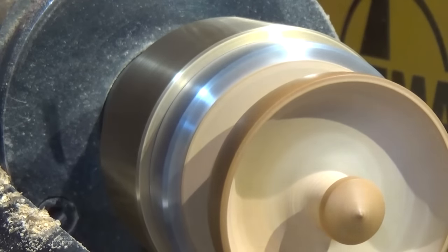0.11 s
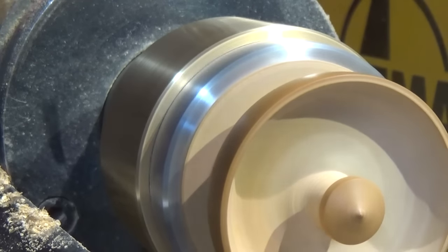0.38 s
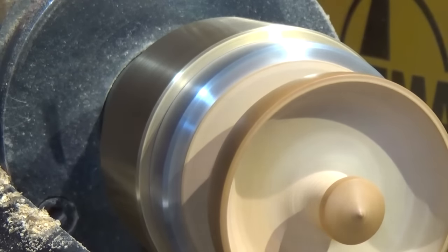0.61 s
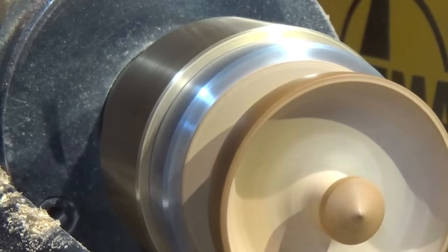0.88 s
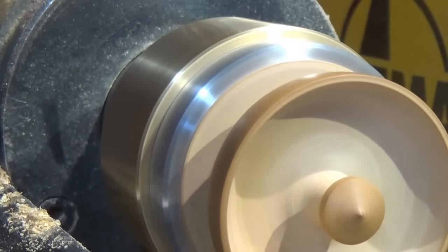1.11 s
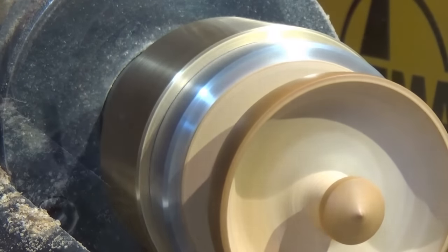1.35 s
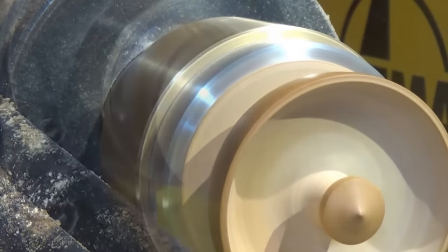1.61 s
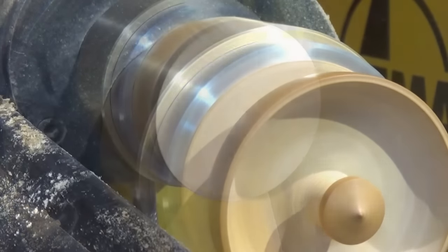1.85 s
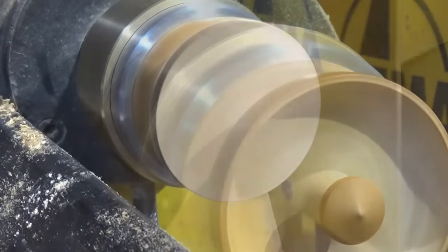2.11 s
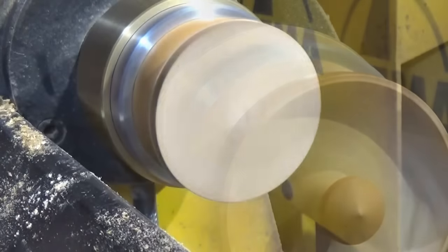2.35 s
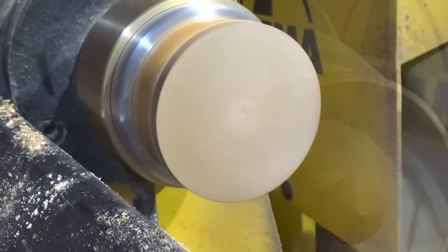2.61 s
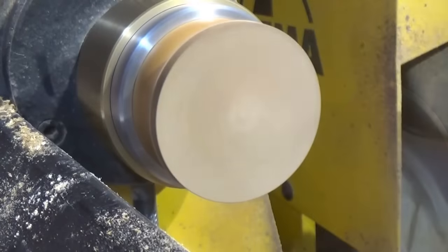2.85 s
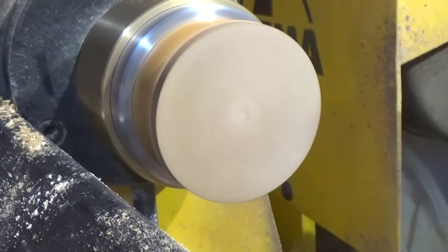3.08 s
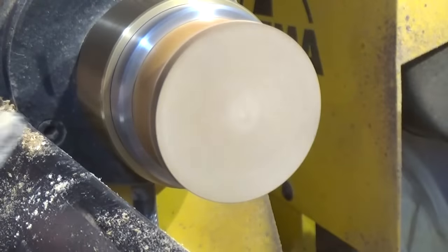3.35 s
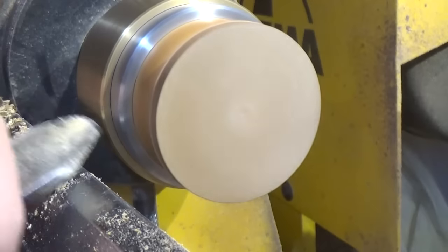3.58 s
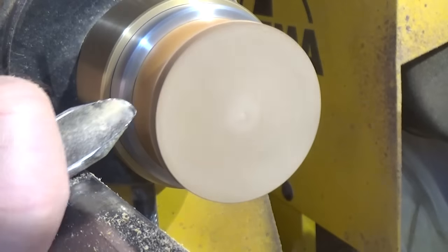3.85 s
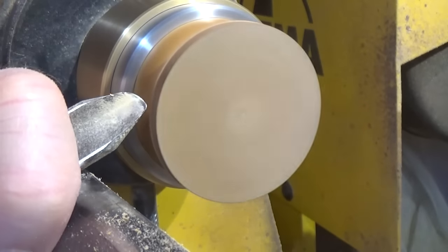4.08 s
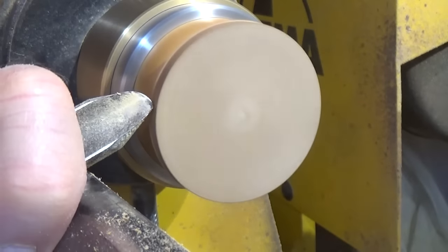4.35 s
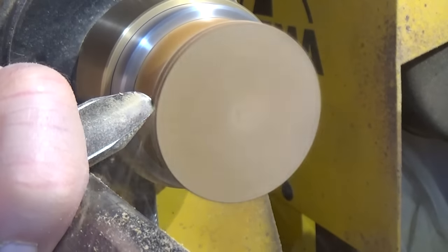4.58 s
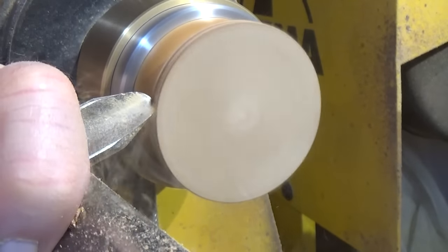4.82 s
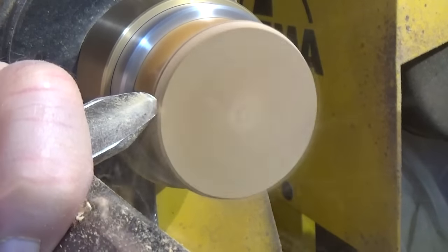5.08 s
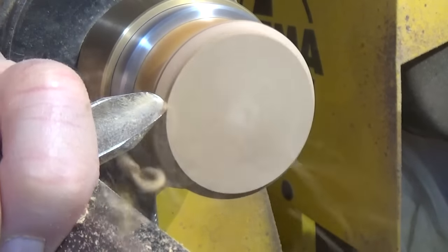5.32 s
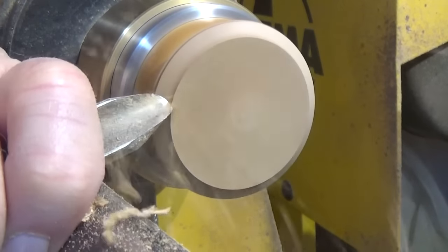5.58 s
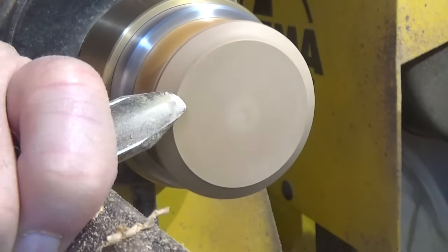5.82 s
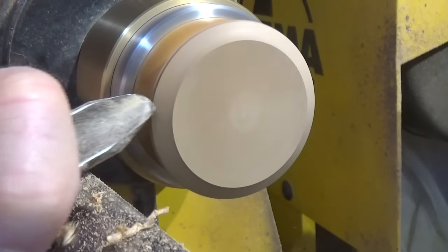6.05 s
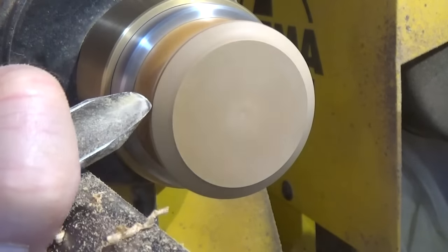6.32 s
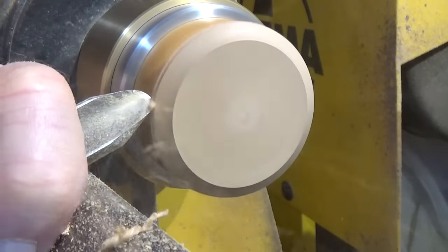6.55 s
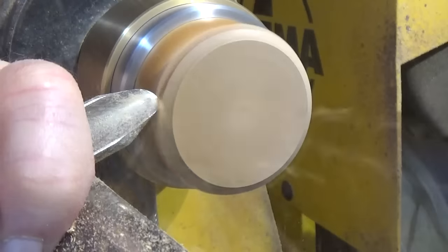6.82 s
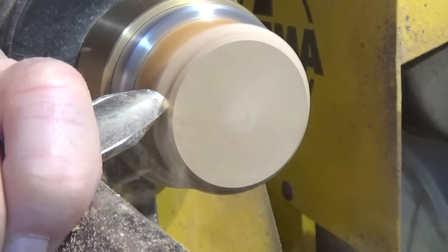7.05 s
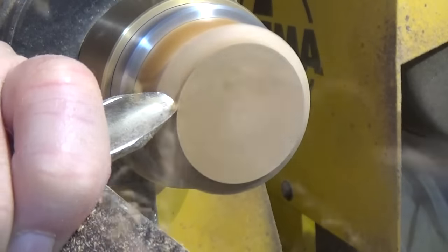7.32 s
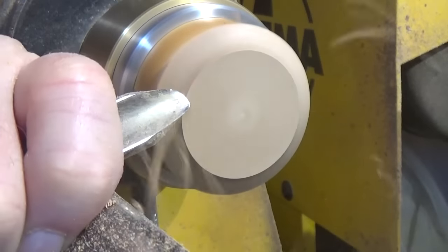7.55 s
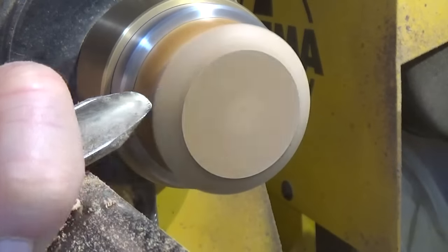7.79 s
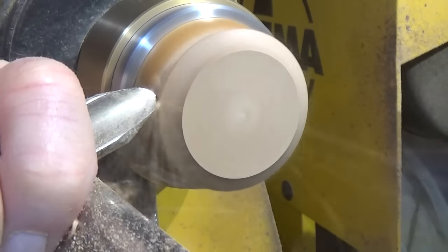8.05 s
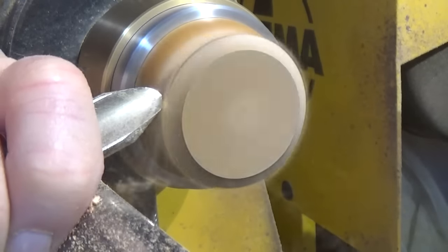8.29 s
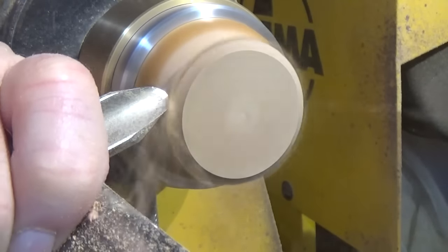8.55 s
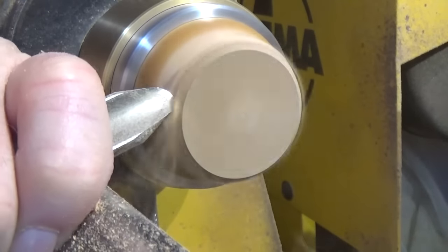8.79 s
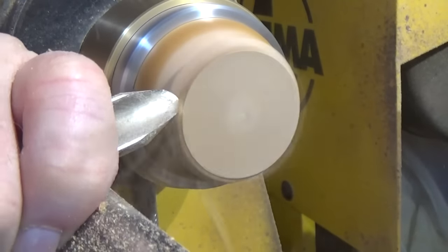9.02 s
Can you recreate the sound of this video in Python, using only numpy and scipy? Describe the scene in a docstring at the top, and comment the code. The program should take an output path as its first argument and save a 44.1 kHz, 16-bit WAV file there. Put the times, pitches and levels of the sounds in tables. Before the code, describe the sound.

Piercing electronic lathe whine with soft fast ticking, a switch knock and overlapping restart, then three harsh, hissing gouge cuts with short gaps.

```python
"""Wood lathe idling, then cut with a gouge

A wood lathe with an electronic drive idles close by: steady switching whine with sidebands, noise-made rumble, one
main tick a turn. A knock sounds at the switch-off; the first run coasts down while a second run-up fades in over it.
Then a gouge takes three rasping passes, with a duller knock as the first one eases off: bursts of torn noise ring
the blank, the tool and its climbing edge resonance. A camera's gain control pushes the machine down under them."""
import sys
import numpy as np
from scipy import signal
from scipy.fft import rfft, irfft, next_fast_len
from scipy.io import wavfile
from scipy.ndimage import uniform_filter1d, minimum_filter1d, map_coordinates

SR = 44100
rng = np.random.default_rng(int(sys.argv[2]) if len(sys.argv) > 2 else 0)


def invert_db(level):
    """Linear amplitude ratio for a level in decibels (20 dB per decade), elementwise."""
    return 10 ** (np.asarray(level, dtype=float) / 20)


def materialize(psi):
    """Save the field psi as 16-bit PCM at rate SR to the path in sys.argv[1].

    A 1-D psi becomes a single channel; in a 2-D psi each row is a channel.
    """
    bounded = np.clip(np.atleast_2d(psi).T, -1, 1)
    quanta = np.round(bounded * 32767).astype(np.int16)
    wavfile.write(sys.argv[1], SR, quanta)


N = 403956
TIME = np.arange(N) / SR

# Spindle: reference speed [turns per s]; a moment of a tick in each run [s]
FULL_SPEED, FIRST_TICK_S, SECOND_TICK_S = 27.25, .0383, 3.0365
# First run: top speed [turns per s], switch-off [s], coasting loss [turns per s each s]
FIRST_TOP, OFF_S, COAST = 27.273, 1.71, 19.13
# Second run: top speed [turns per s], start [s], gain [turns per s each s]
SECOND_TOP, ON_S, RUN_UP = 27.23, 1.55, 19.25
# Slowest speed of either run and loss at full tool contact [turns per s]
CRAWL, SAG = 2, .1
FADE_START_S, FADE_END_S, FADE_CURVE = 1.45, 2.85, 1  # cross-fade; exponent of its gains

WHINE_HZ, DRIVE_HZ = 7989.5, 58  # main switching tone; drive frequency at FULL_SPEED
FIRST_STRAIN_DB, SECOND_STRAIN_DB = -2, 6  # level change of the slot tones below full speed
UPPER_GROWS = .6  # the upper tones grow with this power of the speed
RUMBLE_TRIM_DB, WAVER_DB = -37.5, 0.2  # trim of rumble and ticks; depth of the slow wavering of the whine

# Edge of the gouge: touch ramp, fading of the shallow first bite, easing off [s]; light drag [dB], [dB per s]
TOUCH_S, BITE_S, EASE_S, DRAG_DB, DRAG_DB_PER_S = .018, .05, .022, -8, -25
SKIP_LASTS_S, SKIP_DB = .007, -6  # the edge jumps briefly
THRUM_DB_PER_S = 4.5  # the thrum grows against the growl through every pass
RASP_DB, RASP_SHARE = -3, 0.31  # the rasp lies between scrape and growl: offset; share of the way to growl

# Whine over time: (time [s], level [dB])
WHINE_LEVEL = [(0, -18.5), (.28, -19), (.48, -20), (1.1, -16.5), (1.42, -19), (2.3, -19), (3.4, -19),
               (3.66, -18), (3.95, -17.5), (4.3, -17.5)]
# Sidebands of the drive: (switching tone [Hz], multiple of the drive frequency [1])
SIDEBANDS = [(7989.5, k) for k in (-7.97, -4.94, -4, -2, -1, 1, 2, 6.96, 7.97)] + [(12013.3, k) for k in (-9.97, -6.93, -2, -1, 1, 2, 5.97, 8.95, 9.97)]
# Each sideband against the main tone at full speed, one value a sideband: (level [dB])
FIRST_SIDE_LEVELS = [-21, -27, -30, -24, -10, -6, -22, -25, -14, -32, -29, -18, -18, -19, -23, -30, -31,
                     -33]
SECOND_SIDE_LEVELS = [-25, -25, -29, -22, -8, -10, -20, -26, -13, -31, -32, -21, -21, -17, -26, -36, -33,
                      -35]
# Resonances of bed, belt and bearings in each run: (centre [Hz], width [Hz], relative level [dB])
FIRST_BODY = [(3880, 210, -9.5), (4570, 110, -12), (5800, 190, -11), (6790, 51, -9), (10360, 140, -10.5),
              (14400, 790, -42)]
SECOND_BODY = [(1718, 30, -1.5), (2480, 31, -10.5), (3660, 320, -15.5), (4850, 41, -13.5), (5730, 53, -13),
               (6100, 61, -12), (13500, 320, -40), (15000, 240, -53)]
# Housing resonances common to both runs: (centre [Hz], width [Hz], relative level [dB])
HOUSING = [(174.4, 13, 1), (345.4, 23, 4), (506.5, 6.3, -1), (790.6, 11.3, 5.5), (942, 41, 2),
           (7986, 134, 2), (8460, 180, -10.5), (9300, 420, -13.5), (11100, 240, -17), (12040, 110, -20.5)]
# Smooth noise floor under those resonances: (frequency [Hz], relative level [dB])
FIRST_FLOOR = [(25, -26), (60, -8.5), (250, -5.5), (470, -10), (870, -3.5), (1870, -14), (3800, -18),
               (7000, -41), (10000, -26), (13000, -27), (15500, -51)]
SECOND_FLOOR = [(25, -38), (60, -11.5), (250, -8.5), (470, -9), (870, 1), (1370, -11), (2150, -16),
                (7000, -30.5), (10000, -24), (13000, -34), (15500, -62)]
# Modes the tick sets ringing: (frequency [Hz], relative level [dB], decay by 60 dB [s])
FIRST_RING = [(5564, -8.5, 0.026), (5715, -6.5, 0.036), (3710, -11, 0.01), (5080, -12.5, 0.0093)]
SECOND_RING = [(3870, -4, 0.0068), (6290, -3.5, .025), (9200, -1.5, 0.023), (11430, 5.5, 0.014),
               (13600, -10, 0.013), (5520, -5.5, 0.011), (10370, -3, 0.019)]
# Stereo image of machine and knocks: (frequency [Hz], left-right likeness [1])
MACHINE_ALIKE = [(60, 1), (240, 0.97), (950, 0.76), (3770, 0.84), (15000, 1)]
# Its balance: (frequency [Hz], left minus right [dB])
MACHINE_LEAN = [(60, 0.5), (180, -0.54), (550, 0.35), (1650, 0.5), (4970, -2.5), (15000, 2)]

# Switch and tool knocks: (time [s], level before colouring [dB], brightness share [1])
KNOCKS = [(1.6873, -8, 0.98), (5.773, 2.5, 0.46)]
# Colour of a knock of brightness 1: (frequency [Hz], gain [dB])
KNOCK_COLOUR = [(600, -22), (1800, -2), (4000, 0.5), (5000, -11), (6500, 0.5), (10000, -2), (15000, -29)]

# Passes: (touch [s], easing off [s], leaving [s], edge resonance at the touch [Hz], its climb [Hz per s],
# its strength [dB], blank thrum against tool growl at the touch [dB])
PASSES = [(4.51, 5.78, 5.91, 8460, 330, 2, -3), (6.454, 7.576, 7.625, 8630, 540, 5, -7),
          (7.949, 9.3, 9.4, 9300, 250.4, -2.5, -5.5)]
# One list a pass, before contact: (time [s], shaving hiss [dB], edge scrape [dB], tool growl [dB],
# middle tool modes [dB])
STROKES = [
    [(4.52, 3, -4, -24.5, -21.5), (4.85, 3.5, 0, -23, -16), (4.97, 4.5, 0.5, -11, -15),
     (5.2, -1.5, -2, -15, -10.5), (5.36, -3, -3, -25, -10), (5.55, -6.5, -3.5, -26.5, -22),
     (5.78, -10.5, -9.5, -25.5, -22)],
    [(6.46, 5, -2, -20, -24), (6.65, 0, -3, -17.5, -12.5), (6.9, -6.5, -4.5, -15, -10.5),
     (7.15, -12.5, -8, -18.5, -11.5), (7.4, -16.5, -9.5, -21.5, -12), (7.57, -15.5, -9, -29.5, -22.5)],
    [(7.95, -9, -4, -19.5, -15), (8.15, -16, -9.5, -12, -13), (8.4, -19.5, -11.5, -16, -17.5),
     (8.8, -20.5, -14, -18, -17.5), (9.15, -19, -14.5, -16.5, -15.5)],
]
# Shaving hiss, one row a pass: (peak at the touch [Hz], wait [s], climb [Hz per s], width [Hz],
# width gained per climb [Hz per Hz], floor slope [dB per kHz], floor at 12 kHz [dB])
SHAVING = [(10950, .35, 4000, 720, 1.4, 0.7, -19), (13700, .01, 8200, 1200, 0.1, .3, -10.5),
           (12100, .01, 30, 3000, .3, 0.2, -6)]
# Resonances of gouge and rest: (centre [Hz], width [Hz], relative level [dB])
TOOL = [(1640, 144, -5.5), (2553, 186, 1), (3375, 48, -6.5), (3818, 52, -1.5), (4524, 24, -1.5),
        (4870, 38, -4.5), (5015, 35, -4), (5420, 120, -6.5), (5697, 87, 2), (6380, 120, -6.5)]
# Resonances of the thrumming blank: (centre [Hz], width [Hz], relative level [dB])
BLANK = [(352, 18, -53), (895, 37, 1), (1098, 7.7, 0)]
# Brief jumps of the edge: (time [s])
SKIPS = (6.522, 7.963)
# Stereo image of the cutting: (frequency [Hz], left-right likeness [1])
CUT_ALIKE = [(60, 0.89), (240, 0.8), (950, 0.74), (3770, 0.93), (15000, 1)]
# Its balance: (frequency [Hz], left minus right [dB])
CUT_LEAN = [(60, -3), (150, 0.0), (380, 1), (950, 1.5), (2380, 5.5), (5980, 0), (15000, 0.5)]


def unit(x):
    """Scale to rms 1."""
    return x / np.sqrt(np.mean(x ** 2) + 1e-20)


def along(points, hz):
    """Read (Hz, value) points on a log frequency axis."""
    f, v = np.transpose(points)
    return np.interp(np.log(hz + 1), np.log(f + 1), v)


def curves(rows, t=TIME):
    """One curve for each column after the time."""
    s, *cols = np.transpose(rows)
    return [np.interp(t, s, c) for c in cols]


def wobble(rate):
    """A smooth random curve, rate knots a second."""
    knots = rng.standard_normal(int(N * rate / SR) + 4)
    return map_coordinates(knots, [TIME * rate])


def filtered(x, response):
    """Filter x by a response given as a function of frequency."""
    m = next_fast_len(N + 8192)
    spectrum = rfft(x, m) * response(np.fft.rfftfreq(m, 1 / SR))
    return irfft(spectrum, m)[..., :N]


def peak(hz, centre_hz, width_hz):
    """Power response of one resonance."""
    return 1 / (1 + (2 * (hz - centre_hz) / width_hz) ** 2)


def resonant(modes, hz, floor_db):
    """Gain of resonances standing on a floor, added as powers."""
    modes_power = sum(invert_db(db) ** 2 * peak(hz, centre, width) for centre, width, db in modes)
    return np.sqrt(invert_db(floor_db) ** 2 + modes_power)


def band(hz, lo_hz, hi_hz):
    """Gain of a steep-sided band."""
    return 1 / np.sqrt((1 + (lo_hz / (hz + 1)) ** 12) * (1 + (hz / hi_hz) ** 16))


def stereo(pair, alike, lean):
    """Mix two unrelated versions of a sound as mid and side, setting likeness and balance by frequency."""
    def mid_side_gain(hz):
        angle = np.arccos(np.clip(along(alike, hz), -1, 1)) / 2
        return np.array([np.cos(angle), np.sin(angle)])

    def balance(hz):
        return invert_db(along(lean, hz) / 2 * np.array([[1], [-1]]))

    mid, side = filtered(pair, mid_side_gain)
    return filtered(np.array([mid + side, mid - side]), balance)


def in_pass(t):
    """Index of the latest pass and seconds since its touch."""
    touch_s = np.array(PASSES)[:, 0]
    k = np.maximum(np.searchsorted(touch_s, t) - 1, 0)
    return k, np.maximum(t - touch_s[k], 0)


def contact():
    """Share of full contact between edge and wood: it lands, eases off to a light drag, leaves, and skips."""
    k, since = in_pass(TIME)
    _, ease_s, leave_s = np.array(PASSES)[k, :3].T
    eased = TIME - ease_s
    drag_db = DRAG_DB * np.clip(eased / EASE_S, 0, 1) + DRAG_DB_PER_S * np.maximum(eased, 0)
    drag_db += SKIP_DB * sum(np.exp(-((TIME - s) / SKIP_LASTS_S) ** 2) for s in SKIPS)
    return invert_db(drag_db) * np.clip(np.minimum(since, leave_s - TIME) / TOUCH_S, 0, 1)


def speeds():
    """The first run coasts down at a steady rate; the second runs up and sags under the tool."""
    first = np.clip(FIRST_TOP - COAST * (TIME - OFF_S), CRAWL, FIRST_TOP)
    second = np.clip(CRAWL + RUN_UP * (TIME - ON_S), CRAWL, SECOND_TOP)
    return first, second - SAG * uniform_filter1d(contact(), size=SR // 8)


def turns(speed, tick_s):
    """Spindle turns summed from the speed, whole at each tick."""
    count = np.cumsum(speed) / SR
    return count - count[round(tick_s * SR)]


def ticks(count, ring, half_db, scatter_db):
    """A seam passes once a turn, more weakly half a turn later, and rings short modes at varying strengths."""
    at = np.flatnonzero(np.diff(np.floor(2 * count)) > 0)
    t, out = np.arange(SR // 20) / SR, np.zeros(N)
    weak = np.round(2 * count[at]) % 2
    size_db = scatter_db * rng.standard_normal(len(at)) * (1 + weak)
    onset = 1 - np.exp(-t / .0004)  # soft contact
    for hz, db, t60 in ring:
        weak_db = half_db * weak * np.clip(2.2 - hz / 6000, .25, 2)  # the weak touch is brighter
        mode_db = .6 * scatter_db * rng.standard_normal(len(at))
        blows = np.zeros(N)
        blows[at] = invert_db(size_db + weak_db + mode_db)
        ringing = onset * invert_db(db - 60 * t / t60) * np.sin(2 * np.pi * hz * t)
        out += signal.fftconvolve(blows, ringing)[:N]
    return out


def running(speed, tick_s, body, floor, ring, body_db, floor_db, tick_db, half_db):
    """Rumble and hiss as noise through the body, pulsing twice a turn, plus ticks; both grow with the speed."""
    count = turns(speed, tick_s)
    pulse = invert_db(0.99 * np.cos(4 * np.pi * count) + 0.84 * wobble(15))
    noise = rng.standard_normal((2, N)) * pulse * (speed / FULL_SPEED) ** 0.58
    hum = filtered(noise, lambda hz: resonant(body + HOUSING, hz, along(floor, hz) + floor_db))
    ticking = (speed / FULL_SPEED) ** 1.1 * ticks(count, ring, half_db, scatter_db=1.6)
    return invert_db(body_db) * hum + invert_db(tick_db) * ticking


def whine(side_db, speed, drift, strain_db):
    """Sidebands lie off their switching tone by multiples of the drive frequency, mostly as a warble of pitch."""
    out = np.zeros((2, N))
    drive = 2 * np.pi * np.cumsum(DRIVE_HZ * speed / FULL_SPEED) / SR
    for (carrier, order), db in zip(SIDEBANDS, side_db):
        # slot tones (the farther sidebands) change level within one turn per s below full speed
        strain = strain_db * (abs(order) > 7) * np.clip(FULL_SPEED - speed, 0, 1)
        strain += 20 * UPPER_GROWS * np.log10(speed / FULL_SPEED) * (carrier > WHINE_HZ)
        slip = .6 * wobble(3)
        phase = 2 * np.pi * carrier * TIME + order * drive + drift + 1.37 + slip
        out += invert_db(db + strain + 0.6 * wobble(23)) * np.sin(phase + [[0], [rng.normal(0, 0.38)]])
    return out


def lathe():
    """Both runs share the main switching tone; sidebands, rumble and ticks follow each run's speed."""
    faded = np.clip((TIME - FADE_START_S) / (FADE_END_S - FADE_START_S), 0, 1)
    first, second = (1 - faded) ** FADE_CURVE, faded ** FADE_CURVE
    whine_db = curves(WHINE_LEVEL)[0] + WAVER_DB * wobble(2.93)
    speed_a, speed_b = speeds()
    drift = 0.21 * wobble(14)
    tones = invert_db(0.37 * wobble(14)) * np.sin(2 * np.pi * WHINE_HZ * TIME + drift + [[0], [.2]])
    tones = tones + first * whine(FIRST_SIDE_LEVELS, speed_a, drift, FIRST_STRAIN_DB)
    tones += second * whine(SECOND_SIDE_LEVELS, speed_b, drift, SECOND_STRAIN_DB)
    run_a = running(speed_a, FIRST_TICK_S, FIRST_BODY, FIRST_FLOOR, FIRST_RING,
                    body_db=24.0, floor_db=-2.0, tick_db=22.5, half_db=-11.5)
    run_b = running(speed_b, SECOND_TICK_S, SECOND_BODY, SECOND_FLOOR, SECOND_RING,
                    body_db=24.5, floor_db=-1.0, tick_db=13, half_db=-31)
    both_runs = invert_db(RUMBLE_TRIM_DB) * (first * run_a + second * run_b)
    rumble = stereo(both_runs, MACHINE_ALIKE, MACHINE_LEAN)
    return np.sqrt(2) * invert_db(whine_db + [[-1.3], [1.3]]) * tones + rumble  # whine stronger on the right


def knocks():
    """A sharp noise crack with a short rattling tail; a duller knock has its colour shifted down."""
    out, t = np.zeros((2, N)), np.arange(SR // 5) / SR
    crack = invert_db(-60 * t / .007)
    tail = invert_db(-10.5 - 60 * t / 0.24)
    for s, db, bright in KNOCKS:
        blow = np.zeros((2, N + SR))
        burst = invert_db(db) * (crack + tail) * rng.standard_normal((2, len(t)))
        blow[:, round(s * SR):][:, :len(t)] = burst
        out += filtered(blow[:, :N], lambda hz: invert_db(along(KNOCK_COLOUR, hz / bright)))
    return stereo(out, MACHINE_ALIKE, MACHINE_LEAN)


def tearing(grain_db, fibre_db, shift):
    """Fibres tear in short bursts of noise; the edge meets the hard grain twice a turn."""
    count = turns(speeds()[1], SECOND_TICK_S) - shift
    swing = grain_db * np.cos(4 * np.pi * count) + 0.69 * np.cos(2 * np.pi * count)
    bursts = invert_db(swing + fibre_db * wobble(350) + 0.7 * wobble(25))
    return unit(bursts * rng.standard_normal((2, N)))


def gliding(x, gain):
    """Pass x through a gain of (frequency, time), at even power."""
    hz, t, z = signal.stft(x, SR, nperseg=512)
    g = gain(hz[:, None], t)
    even = g / np.sqrt(np.mean(g ** 2, axis=0))
    return signal.istft(z * even, SR, nperseg=512)[1][:, :N]


def shaving(hz, t):
    """Power of the shaving hiss: a peak that climbs and widens, over a sloping floor."""
    k, since = in_pass(t)
    start_hz, wait_s, climb, width_hz, widens, slope_db, floor_db = np.array(SHAVING)[k].T
    risen_hz = climb * np.maximum(since - wait_s, 0)
    floor = invert_db(floor_db + slope_db * (hz - 12000) / 1000) ** 2
    return peak(hz, start_hz + risen_hz, width_hz + widens * risen_hz) + floor


def edge_ring(hz, t):
    """Power of the edge resonance, which climbs through every pass."""
    k, since = in_pass(t)
    start_hz, climb, ring_db = np.array(PASSES)[k, 3:6].T
    return invert_db(ring_db) ** 2 * peak(hz, start_hz + climb * since, 160)


def gouge():
    """Torn fibres ring blank and tool in each pass; two high resonances climb as the edge travels."""
    k, since = in_pass(TIME)
    hiss_db, edge_db, growl_db, middle_db = curves(np.concatenate(STROKES))
    shallow_db = -10 * np.exp(-since / BITE_S)
    growl_db, middle_db = growl_db + shallow_db, middle_db + shallow_db
    thrum_db = growl_db + np.array(PASSES)[k, 6] + THRUM_DB_PER_S * since
    rasp_db = edge_db + RASP_DB + RASP_SHARE * (growl_db - edge_db)

    def edge_gain(hz, t):
        fixed_peak = 0.38 * peak(hz, 8290, 660)
        return np.sqrt(edge_ring(hz, t) + fixed_peak + 0.058) * band(hz, 8550, 9400)

    def hiss_gain(hz, t):
        return np.sqrt(shaving(hz, t)) * band(hz, 9800, 14500) * (hz < 15800)

    def ring(modes, floor_db, lo_hz, hi_hz):
        return unit(filtered(low, lambda hz: resonant(modes, hz, floor_db) * band(hz, lo_hz, hi_hz)))

    low = tearing(grain_db=1.0, fibre_db=1.42, shift=0.22)
    high = tearing(grain_db=2.0, fibre_db=1.5, shift=0.05)
    scrape = tearing(grain_db=1.5, fibre_db=2.0, shift=0.21)
    out = invert_db(thrum_db) * ring(BLANK, -13.0, 358, 1450)
    out += invert_db(growl_db) * ring(TOOL, -44, 1500, 2730)
    out += invert_db(middle_db) * ring(TOOL, -15.5, 3520, 4980)
    out += invert_db(rasp_db) * ring(TOOL, -12, 5700, 8200)
    out += invert_db(edge_db) * gliding(scrape, edge_gain)
    out += invert_db(hiss_db) * gliding(high, hiss_gain)
    return stereo(contact() * out, CUT_ALIKE, CUT_LEAN)


def scene():
    """Machine, knocks and cutting."""
    return lathe() + knocks() + gouge()


def roll_off(x):
    """The treble ends steeply here."""
    return signal.sosfilt(signal.butter(12, 15750, fs=SR, output="sos"), x)


def record(dry):
    """The camera's gain control ducks at once under loud sound and recovers slowly; a limiter holds the peaks."""
    ceiling_db, listen_s, recover_s = -15, 0.013, 1.48
    span = round(listen_s * SR)
    past = np.pad(np.mean(dry ** 2, axis=0), (span // 2, 0))  # the window looks back only
    level_db = 10 * np.log10(abs(uniform_filter1d(past, size=span))[:N] + 1e-12)
    # the excess in dB is held at its maximum and dies away exponentially
    over = np.log(np.maximum(level_db - ceiling_db, 1e-3)) + TIME / recover_s
    duck_db = -np.exp(np.maximum.accumulate(over) - TIME / recover_s)
    held = dry * invert_db(duck_db)
    need = np.minimum(1, 0.53 / (abs(held).max(axis=0) + 1e-9))
    gain = uniform_filter1d(minimum_filter1d(need, size=132), size=66)
    return roll_off(held * gain)


dry = scene()
out = record(dry)
materialize(out)
```